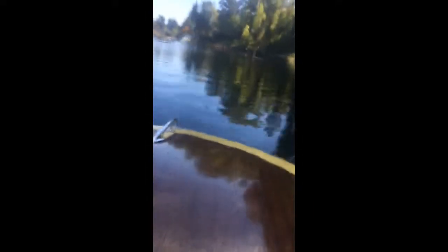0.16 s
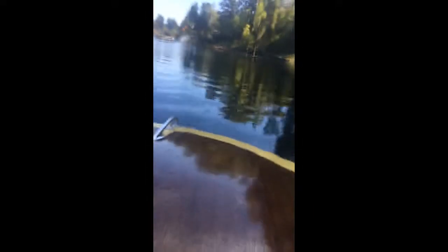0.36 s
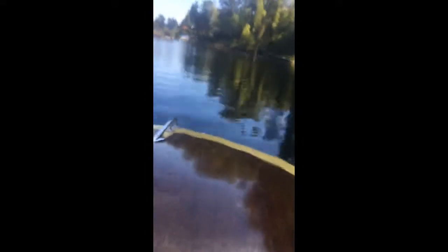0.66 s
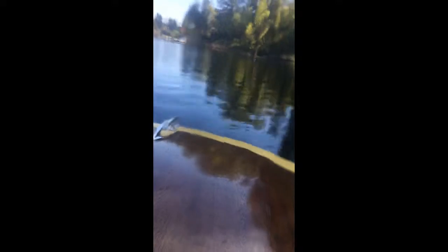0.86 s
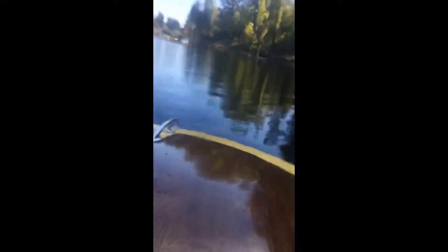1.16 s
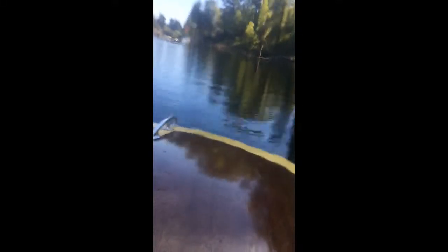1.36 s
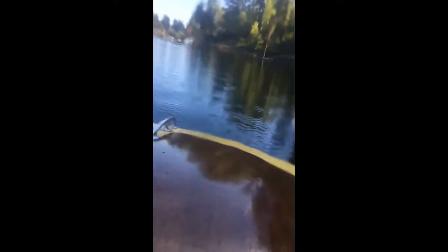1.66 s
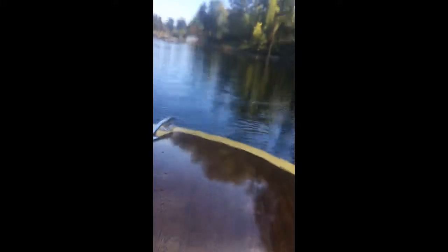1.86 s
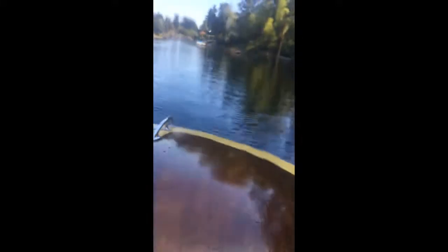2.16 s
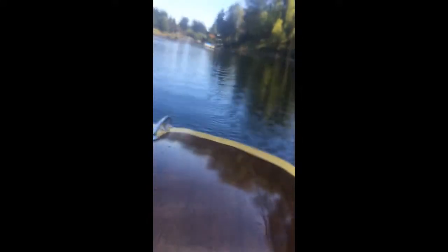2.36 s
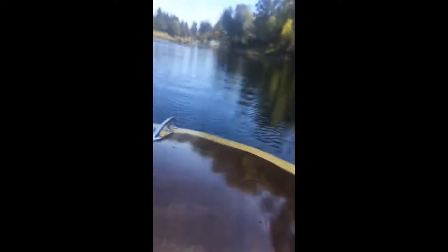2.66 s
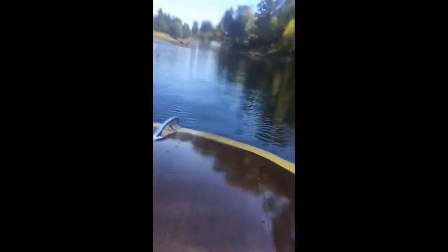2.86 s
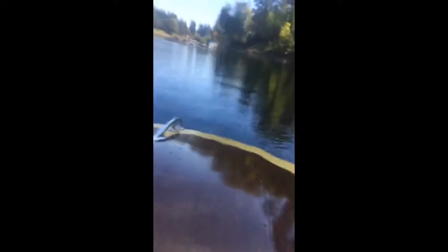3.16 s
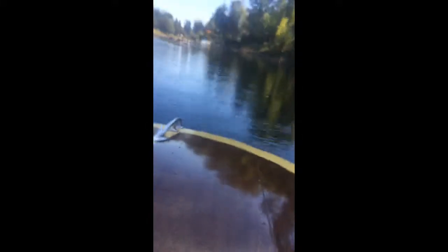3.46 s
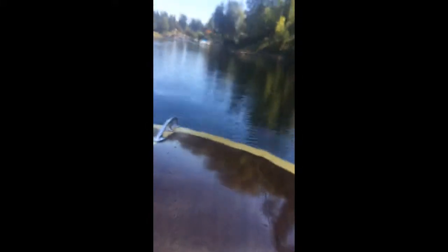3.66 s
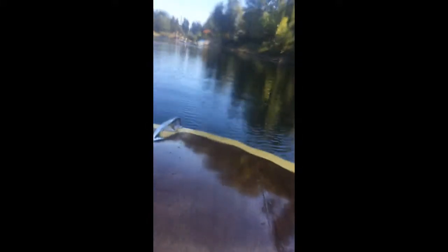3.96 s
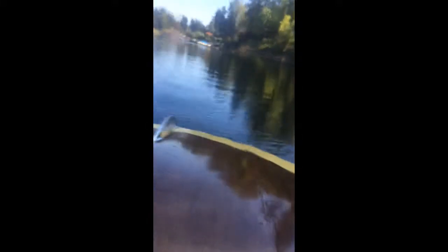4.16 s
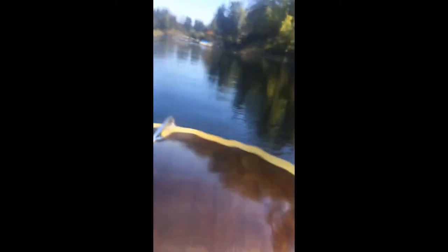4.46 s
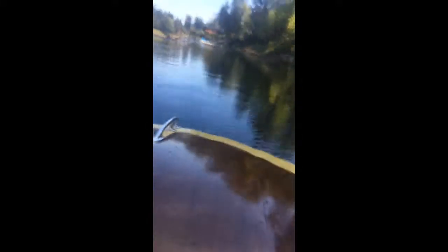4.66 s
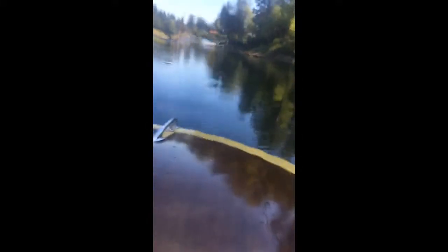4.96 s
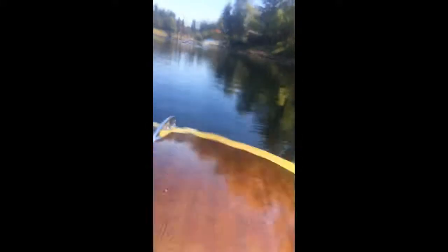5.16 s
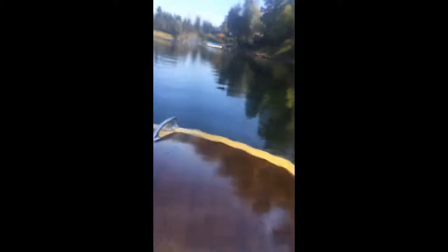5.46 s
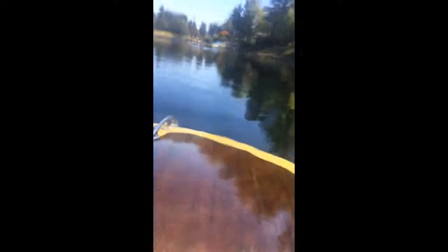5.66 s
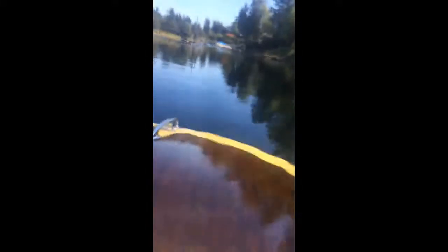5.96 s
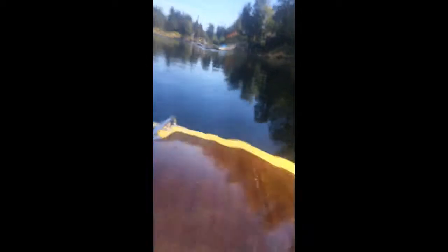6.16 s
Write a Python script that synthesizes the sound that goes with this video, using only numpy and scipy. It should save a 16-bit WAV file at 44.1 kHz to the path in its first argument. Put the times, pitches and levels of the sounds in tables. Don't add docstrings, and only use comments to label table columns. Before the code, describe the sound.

Heard close from the cockpit of a light wooden boat on a calm river, a twin-cylinder two-stroke outboard holds a loud, low buzzing drone. It stumbles repeatedly at first, briefly lifts in pitch near three seconds, then sinks slightly and runs even. Gas and spray hiss, sheet metal rattles and water drums under the hull.

```python
import sys
import numpy as np
from scipy import signal
from scipy.fft import rfft, irfft, next_fast_len
from scipy.io import wavfile
from scipy.ndimage import uniform_filter1d, minimum_filter1d

SR = 44100
rng = np.random.default_rng(int(sys.argv[2]) if len(sys.argv) > 2 else 0)


def invert_db(level):
    return 10 ** (np.asarray(level, dtype=float) / 20)


def persist_wave(psi):
    counts = np.round(np.clip(psi, -1, 1) * 32767).astype(np.int16)
    wavfile.write(sys.argv[1], SR, np.atleast_2d(counts).T)


N = 278271

# (time [s], shaft rate [Hz])
SHAFT_SPEED = [(0.0, 79.5), (0.03, 79.81), (1.16, 80.34), (1.88, 80.08), (2.49, 78.3), (2.72, 78.77),
               (2.99, 81.5), (3.06, 80.53), (3.69, 78.2), (4.31, 77), (5.41, 75.98), (5.54, 76.1),
               (6.31, 76.26)]
# (time [s], settling [0 lumpy to 1 even])
SETTLING = [
    (0, 0),
    (2.7, 0),
    (3.2, .4),
    (4.2, 1),
    (6.31, 1),
]
# (multiple of the shaft rate, level [dB])
LUMPY_TONES = [(0.5, -30), (1, -9.5), (1.5, -13.5), (2, 0), (2.5, -14), (3, -23.5), (3.5, -22.5), (4, -23),
               (4.5, -41), (5, -22.5), (5.5, -40), (6, -21.5), (6.5, -28), (7, -30.5), (7.5, -30.5),
               (8, -26), (8.5, -29.5), (9, -39.5), (9.5, -38), (10, -35.5), (10.5, -38), (11, -44),
               (11.5, -36.5), (12, -44.5), (12.5, -45.5), (13, -35.5), (13.5, -39), (14, -36), (14.5, -43),
               (15, -38)]
# (multiple of the shaft rate, level [dB])
EVEN_TONES = [(0.5, -25.5), (1, -9.5), (1.5, -18.5), (2, 0), (2.5, -22), (3, -19.5), (3.5, -28.5), (4, -15),
              (4.5, -36), (5, -18.5), (5.5, -38.5), (6, -24), (6.5, -40.5), (7, -27.5), (7.5, -29),
              (8, -22.5), (8.5, -38), (9, -37), (9.5, -39.5), (10, -42.5), (10.5, -40.5), (11, -36.5),
              (11.5, -41), (12, -36), (12.5, -44.5), (13, -35), (13.5, -44.5), (14, -36), (14.5, -43.5),
              (15, -37.5)]
# (time [s], length [s], loss of firing tone [dB])
STUMBLES = [(0.037, 0.065, 8), (0.16, 0.094, 2.5), (0.28, 0.033, 19), (0.455, 0.025, 1.5), (.62, 0.23, 3.5),
            (0.667, .03, 10), (0.74, 0.11, 10.5), (0.943, 0.025, 9), (1.154, 0.081, 9), (1.446, 0.17, 5),
            (1.588, 0.044, 12), (1.874, 0.029, 2.5), (2.177, 0.051, 3.5), (2.35, 0.028, 4), (2.77, .04, 7),
            (2.827, .13, 9.5), (3.2, 0.21, 2.5), (3.55, 0.22, -2), (3.71, .05, 5.5), (4.18, 0.047, 2),
            (4.63, 0.048, 6), (5.08, 0.21, 3)]
# (frequency [Hz], width [Hz], level [dB])
BOOM = [(111, 180, 2), (207, 109, 6), (254, 57, -8.5)]
# (time [s], level [dB])
GAS_FLOW = [(0, -34.5), (1.4, -33), (2.15, -36), (2.9, -33.5), (3.4, -34), (3.46, -36.5), (3.75, -35),
            (4.98, -35.5), (5.1, -34.5), (5.9, -35), (6.1, -35.5), (6.31, -35)]
# (frequency [Hz], level [dB per Hz])
ROAR_COLOUR = [(290, -29), (500, -1), (569, -7.5), (619, -2), (746, -13), (1050, -12), (1380, -14),
               (1640, -14), (2310, -18.5), (2780, -24.5), (3200, -21), (3910, -23.5), (4850, -28.5),
               (14600, -43.5), (15200, -41.5)]
# (frequency [Hz], level [dB per Hz])
WASH_COLOUR = [(8, -11), (25, -15), (45, 0.5), (100, 8), (200, 6), (300, -2), (450, -7.5), (700, -28.5),
               (900, -25.5)]


def level(x, db):
    return x * invert_db(db) / np.sqrt(np.mean(x ** 2))


def curves(table):
    seconds, *columns = np.transpose(table)
    return [np.interp(np.arange(N) / SR, seconds, column) for column in columns]


def walk(rate):
    t = np.arange(0, N + 64, 32) * rate / SR
    k = t.astype(int)
    values = rng.standard_normal(int(t[-1]) + 2)
    smooth = values[k] + (values[k + 1] - values[k]) * np.sin(np.pi / 2 * (t - k)) ** 2
    return 1.26 * np.interp(np.arange(N) * rate / SR, t, smooth)


def pulses(at, size):
    out = np.zeros(N + 2)
    i = np.clip(at, 0, N).astype(int)
    np.add.at(out, i, size * (1 - at % 1))
    np.add.at(out, i + 1, size * (at % 1))
    return out[:N]


def sample_at(turn, turns):
    return np.interp(turn, turns, np.arange(N))


def ring(x, modes):
    out = 0
    for k, (hz, width_hz, db) in enumerate(modes):
        b, a = signal.iirpeak(hz, hz / width_hz, fs=SR)
        out = out + (-1) ** k * invert_db(db) * signal.lfilter(b, a, x)
    return out


def patchy_noise(colour, swell_db, flicker_db, flicker_rate):
    hz, db = np.transpose(colour)
    size = next_fast_len(N)
    f = np.maximum(np.fft.rfftfreq(size, 1 / SR), 1)
    shape = invert_db(np.interp(np.log(f), np.log(hz), db, left=-90, right=-90))
    spectrum = rfft(rng.standard_normal(size)) * shape
    out = 0
    for centre in np.arange(2 * np.log2(hz[0]) // 1, 2 * np.log2(hz[-1]) + 1):
        band = np.clip(1 - abs(2 * np.log2(f) - centre), 0, 1)
        out = out + invert_db(flicker_db * walk(flicker_rate)) * irfft(spectrum * band, size)[:N]
    return level(out * invert_db(swell_db * walk(1.3)), 0)


def firing_tones(turns, settled, tone_db, others_db):
    out = invert_db(tone_db) * np.cos(4 * np.pi * turns + .1 * walk(15))
    pattern = (1.2 - .35 * settled) * np.tanh(3 * walk(5))
    lead = .11 - .08 * settled
    loose = 1 - .65 * settled
    upper = [(k, -38.5 - 1.75 * (k - 16)) for k in range(16, 27)]
    for (k, lumpy_db), (_, even_db) in zip(LUMPY_TONES + upper, EVEN_TONES + upper):
        if k == 2:
            continue
        is_half = k % 1 != 0
        tone_level_db = lumpy_db + settled * (even_db - lumpy_db)
        gain = invert_db(others_db + tone_level_db + 1.5 * loose * walk(9))
        shift = -.5 if is_half else lead
        angle = 2 * np.pi * k * (turns + shift) + loose * (.15 + .04 * k) * walk(14)
        angle = angle - .25 * max(k - 5, 0) ** 2
        out = out + (pattern if is_half else 1) * gain * np.cos(angle)
    return np.sqrt(2) * out


def stumbling():
    t = np.arange(N) / SR
    return sum(loss_db * np.exp(-(2.8 * (t - s) / length_s) ** 2) for s, length_s, loss_db in STUMBLES)


def misfires(turns, thump_db):
    n = np.arange(1, int(turns[-1]))
    strength, timing = rng.standard_normal((len(n), 2)).T
    skip = signal.lfilter([1], [1, .5], strength)
    beat = pulses(sample_at(n + .5 + .05 * timing, turns), skip)
    spell_db = uniform_filter1d(thump_db, size=SR // 6)
    pipe = ring(beat, [(171, 320, 0)])
    return invert_db(spell_db) * level(ring(pipe, BOOM), -4.5)


def cowl(turns, flow_db, count=26):
    at = sample_at(np.arange(1, int(2 * turns[-1])) / 2, turns)
    colour_hz, colour_db = np.transpose(ROAR_COLOUR)
    low_hz, high_hz, width_hz = 700, 4300, 32
    out = 0
    for hz in np.geomspace(low_hz, high_hz, count) * (1 + .02 * rng.standard_normal(count)):
        force, spell = rng.standard_normal((len(at), 2)).T
        spell = uniform_filter1d(spell, size=16) * np.sqrt(16)
        mode_db = np.interp(np.log(hz), np.log(colour_hz), colour_db) + 5 * np.log10(hz)
        knocks = pulses(at, force * invert_db(4.2 * spell))
        out = out + ring(knocks, [(hz, width_hz, mode_db)])
    return invert_db(flow_db) * level(out, -5.5)


def roar(turns, roar_db):
    once_a_turn = 0.037 * np.cos(2 * np.pi * (turns - .55))
    twice_a_turn = 0.056 * np.cos(4 * np.pi * (turns - .1))
    puff = 1 + 0.014 * walk(17) + once_a_turn + twice_a_turn
    noise = patchy_noise(ROAR_COLOUR, swell_db=.1, flicker_db=.9, flicker_rate=14.)
    return invert_db(roar_db + 1.5) * puff * noise


def ticks(turns, tick_db):
    n = np.arange(1, int(turns[-1]))
    timing, stray_timing, size, stray_size = rng.standard_normal((len(n), 4)).T
    clicks = pulses(sample_at(n + .55 + .05 * timing, turns).round(), invert_db(4 * np.tanh(size)))
    strays = pulses(sample_at(n + .3 * stray_timing, turns).round(), invert_db(4 * np.tanh(stray_size) - 4))
    metal = ring(clicks + strays, [(4200, 2500, -7.0), (11300, 6400, 6.5)])
    return invert_db(tick_db) * level(metal, -3.5)


def wash(settled):
    surge_s, surge_length_s = 3.04, 0.81
    surge_db = 2 * np.exp(-((np.arange(N) / SR - surge_s) / surge_length_s) ** 2)
    noise = patchy_noise(WASH_COLOUR, swell_db=.6, flicker_db=1.8, flicker_rate=14.)
    return invert_db(surge_db - 22 - 0.5 * settled) * noise


def scene():
    (shaft_hz,), (settled,), (flow_db,) = curves(SHAFT_SPEED), curves(SETTLING), curves(GAS_FLOW)
    turns = np.cumsum(shaft_hz) / SR + .37
    flow_db = flow_db + .7 * walk(18)
    loss_db = stumbling()
    catch_up_s = 0.056
    caught_db = 0.05 * np.interp(np.arange(N) - catch_up_s * SR, np.arange(N), loss_db)
    tone_db = -11 + 0.76 * settled - loss_db + caught_db
    others_db = -13 + 1.5 * settled + 0.087 * loss_db
    thump_db = -24 + 2 * settled + 0.33 * loss_db + 2 * walk(3)
    usual_db = np.mean(flow_db)
    tick_db = usual_db - 21 + .8 * (flow_db - usual_db) + 0.7 * walk(8.9)
    engine = firing_tones(turns, settled, tone_db, others_db) + misfires(turns, thump_db)
    mix = engine + cowl(turns, flow_db) + roar(turns, flow_db) + ticks(turns, tick_db) + wash(settled)
    return mix[None]


def band_limit(x):
    return signal.sosfilt(signal.butter(12, 15350, fs=SR, output="sos"), x)


def record(dry):
    dry = signal.sosfilt(signal.butter(1, 8, "high", fs=SR, output="sos"), dry)
    ceiling = .705
    k = SR // 400
    needed = np.minimum(ceiling / (abs(dry) + 1e-9), 1)
    gain = uniform_filter1d(minimum_filter1d(needed, 2 * k), k)
    return band_limit(dry * gain)


dry = scene()
out = record(dry)
persist_wave(out)
```